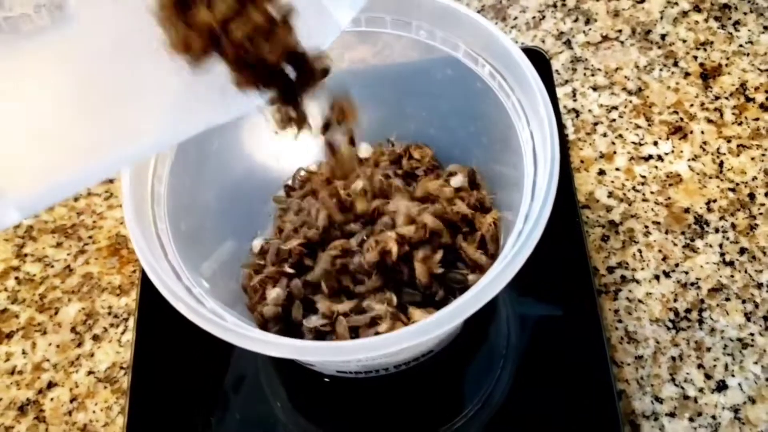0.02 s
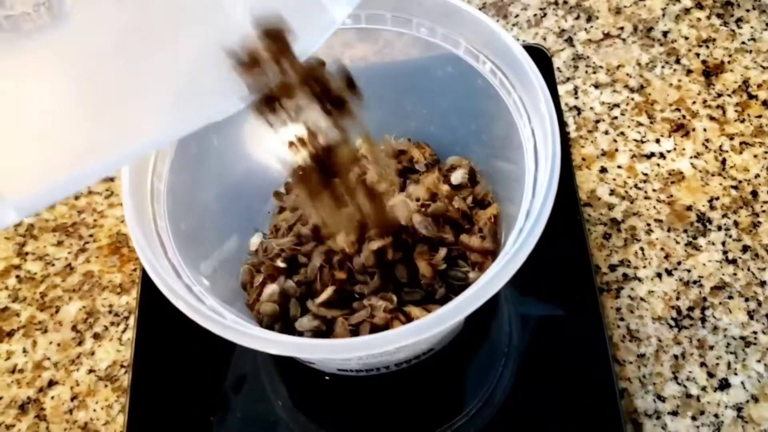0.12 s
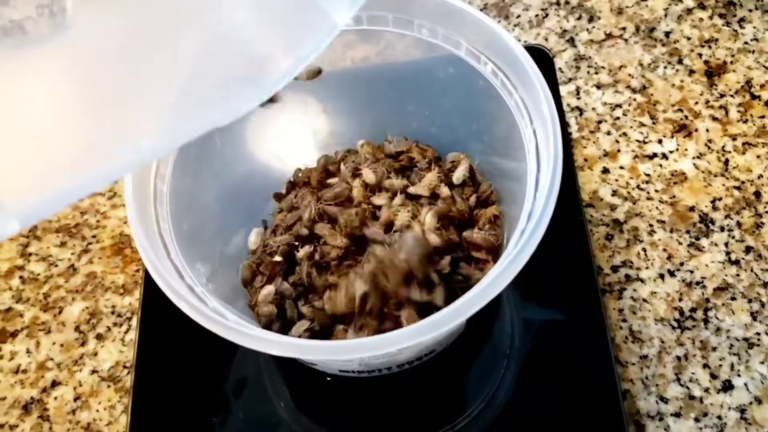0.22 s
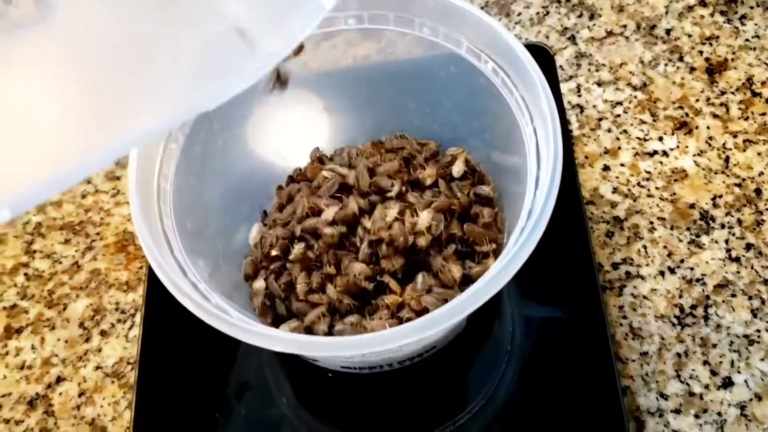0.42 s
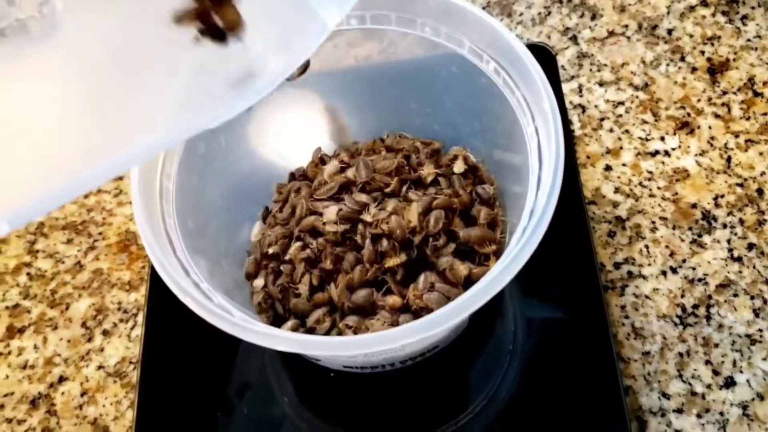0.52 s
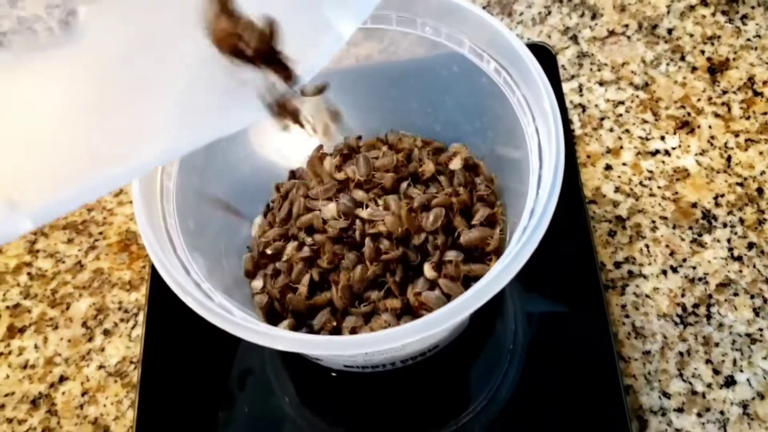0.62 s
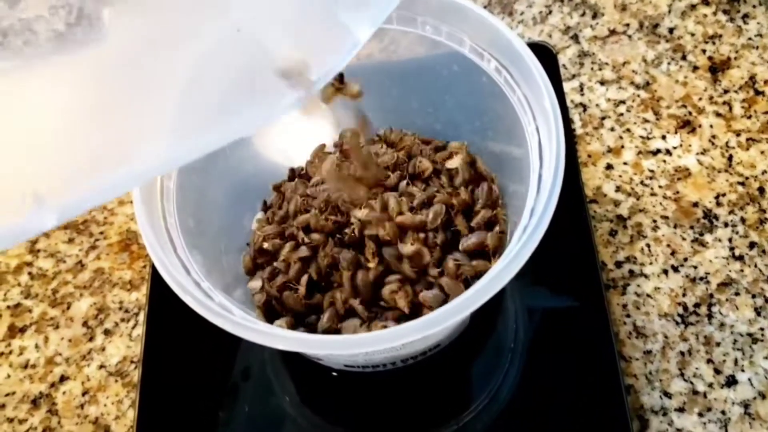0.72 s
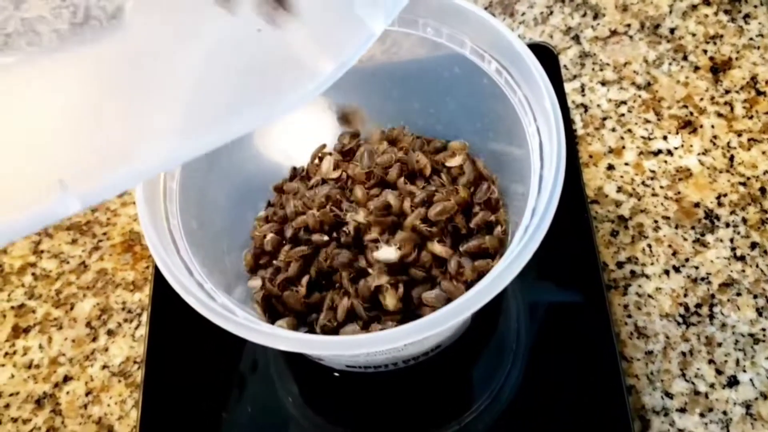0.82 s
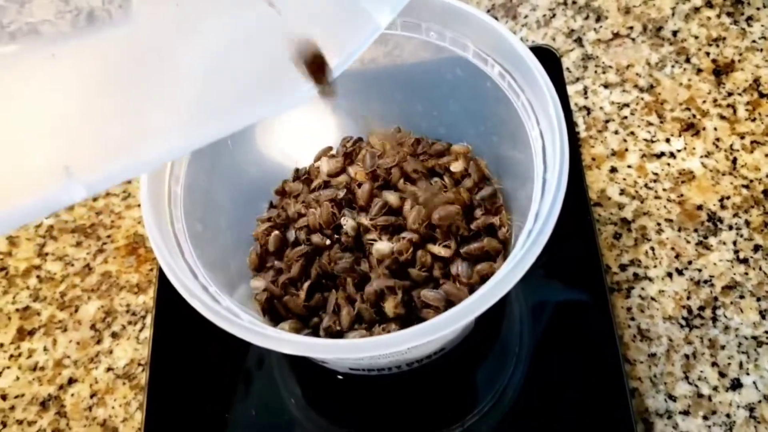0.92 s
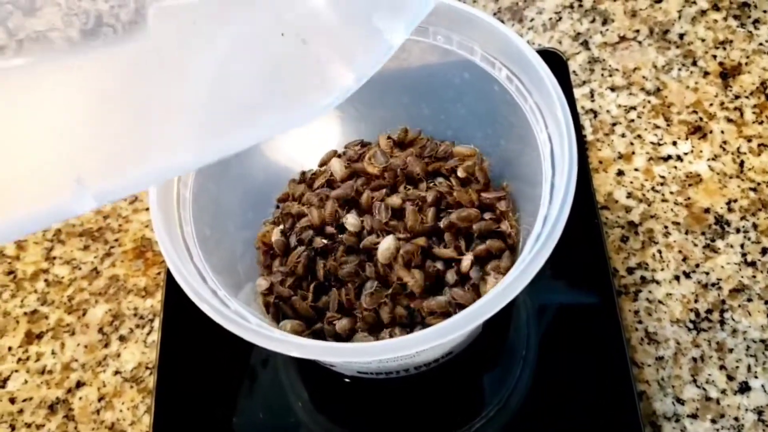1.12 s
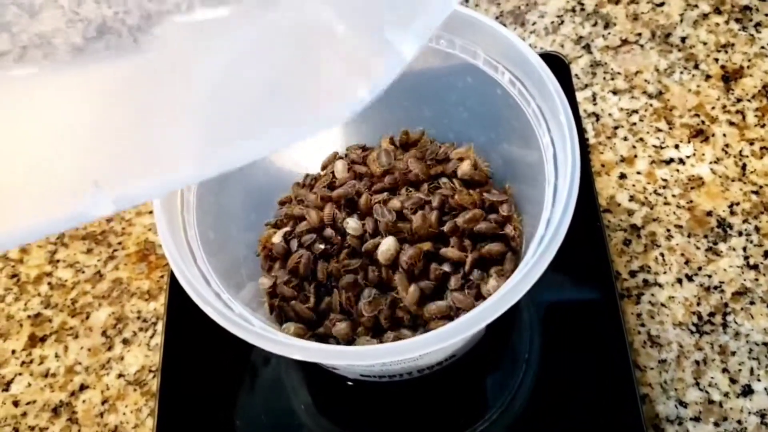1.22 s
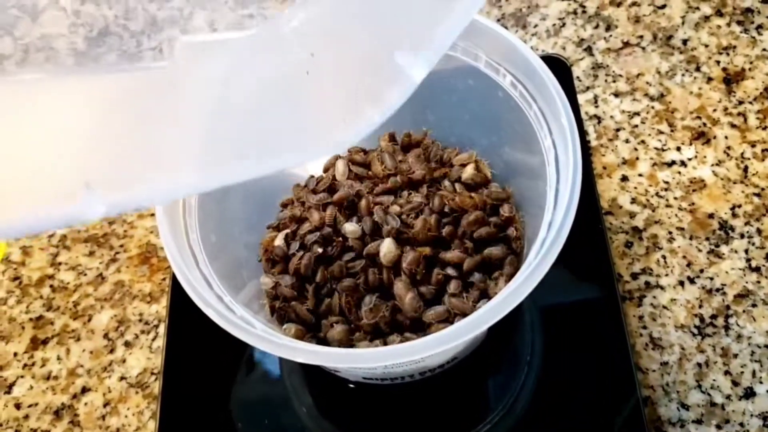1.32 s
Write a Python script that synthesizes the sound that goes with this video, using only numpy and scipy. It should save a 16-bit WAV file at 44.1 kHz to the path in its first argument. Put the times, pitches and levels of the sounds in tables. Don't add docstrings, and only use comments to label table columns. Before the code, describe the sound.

Finger taps on a thin plastic tub, close and dry: insects scrape briefly at the start, a soft touch at 0.15 s, then hollow snapping taps at 0.23, 0.41, 0.53 (hardest), 0.64 and 0.75 s. Grains slide left; small ticks and knocks land in a cup, often right. After 0.85 s, faint scratching, sparse clicks near 1.0-1.36 s, a soft cup flex at 1.2 s, low hum and hiss.

```python
import sys
import numpy as np
from scipy import signal
from scipy.fft import rfft, irfft
from scipy.io import wavfile
from scipy.ndimage import uniform_filter1d

SR = 44100
rng = np.random.default_rng(int(sys.argv[2]) if len(sys.argv) > 2 else 0)


def store_wav(level_fs):
    pcm = np.round(np.clip(np.atleast_2d(level_fs), -1, 1) * 32767)
    wavfile.write(sys.argv[1], SR, pcm.T.astype(np.int16))


def to_linear_factor(level_db):
    exponent = np.asarray(level_db, float) / 20
    return 10 ** exponent


N = 61740


def read(points, x):
    a, b = np.transpose(points)
    return np.interp(x, a, b)


def colour(x, points):
    hz, db = np.transpose(points)
    f = np.fft.rfftfreq(x.shape[-1], 1 / SR)
    gain = to_linear_factor(np.interp(np.log(f + 1), np.log(hz), db)) * np.sqrt(SR / 2)
    return irfft(rfft(x) * gain, x.shape[-1])


def evened(x):
    return x / np.sqrt(np.mean(x ** 2) + 1e-20)


def crackle(per_s, spread_db):
    size = to_linear_factor(spread_db * np.minimum(rng.exponential(1, (2, N)), 3.2))
    size = size * rng.standard_normal((2, N))
    return evened(size * (rng.random((2, N)) < per_s / SR))


def ring(hz, db, t60, lag_s=0):
    t = np.maximum(np.arange(SR // 4) / SR - lag_s, 0)
    return to_linear_factor(db - 60 * t / t60) * np.sin(2 * np.pi * hz * t)


def push(ms):
    u = np.arange(600) / (ms * SR / 1000)
    force = np.exp(-(5.2 * (u - .75)) ** 2 / 2)
    return force / force.sum()


def add(mix, s, sound):
    part = mix[:, round(s * SR):][:, :sound.shape[1]]
    part += sound[:, :part.shape[1]]


def sides(db):
    return to_linear_factor(np.array([[min(db, 0)], [min(-db, 0)]]))


def slides():
    # start t/s, length/s, level/dB
    shakes = [
        (-.03, 0.081, -42.5),
        (0.051, 0.1, -56.5),
        (0.23, 0.028, -46.5),
        (0.247, 0.1, -56.5),
        (0.421, 0.049, -52.5),
        (0.558, 0.04, -47.5),
        (0.649, 0.051, -52),
        (0.744, 0.091, -65.5),
    ]
    # f/Hz, level/dB
    scrape = [(150, -6.5), (500, 0.5), (1000, 0), (2200, -3.5), (3800, -8.5), (7000, -14.5), (8800, -24),
              (15000, -36)]
    bed_db, bed_end_s, right_db = -64, 0.836, -12.5
    t = np.arange(N) / SR
    swell = to_linear_factor(bed_db) * np.clip((bed_end_s - t) / 0.14, 0, 1)
    for s, length, db in shakes:
        swell = swell + to_linear_factor(db) * np.sin(np.pi * np.clip((t - s) / length, 0, 1)) ** 2
    rush = evened(colour(crackle(14000, spread_db=-0.5), scrape))
    return swell * rush * to_linear_factor(np.array([[0], [right_db]]))


def legs():
    # t/s, level/dB
    bustle = [(0, 7), (.1, 7.5), (.22, 8.5), (.35, 5.5), (.5, 6), (.65, 4.5), (.78, 3.5), (.86, 2.5),
              (.93, 1), (.965, 3.5), (1.02, 2), (1.06, 1), (1.13, -1.5), (1.16, 0), (1.4, 1)]
    # f/Hz, level/dB per Hz
    left_tone = [(300, -125), (1000, -118), (1500, -121), (3000, -123), (6000, -127), (7500, -117),
                 (11000, -128), (15500, -142)]
    right_tone = [(600, -118), (1500, -120), (2500, -110), (3400, -113), (5600, -102), (7200, -116),
                  (12500, -110), (15500, -128)]
    left_bustle = 2.23
    db = read(bustle, np.arange(N) / SR)
    left, right = crackle(7400, spread_db=2)
    flicker = 0.45 * evened(uniform_filter1d(rng.standard_normal(N), 250))
    scratch = np.array([colour(left, left_tone), colour(right, right_tone)])
    return scratch * to_linear_factor(db * [[left_bustle], [1]] + flicker)


def hum():
    # f/Hz, level/dB per Hz
    tone = [(40, -125), (80, -112), (140, -99), (260, -101), (400, -106), (600, -108), (1000, -120),
            (2000, -135)]
    # t/s, level/dB
    stir = [(0, 8.5), (.7, 18), (.9, 5), (1.12, -0.5), (1.16, 11), (1.4, 6.5)]
    left_db, same = -5, 0.72
    right, other = rng.standard_normal((2, N))
    left = to_linear_factor(left_db) * (same * right + np.sqrt(1 - same ** 2) * other)
    return colour(np.array([left, right]), tone) * to_linear_factor(read(stir, np.arange(N) / SR))


def appliance():
    # f/Hz, width/Hz, left level/dB, right level/dB
    bands = [(2163, 420, -69.5, -77.5), (904, 290, -85, -82.5)]
    f = np.fft.rfftfreq(N, 1 / SR)
    hiss = rfft(rng.standard_normal((2, N)))
    out = np.zeros((2, N))
    for hz, width, left_db, right_db in bands:
        band = irfft(hiss / (1 + (2 * (f - hz) / width) ** 2), N)
        out += to_linear_factor(np.array([[left_db], [right_db]])) * evened(band)
    waver = 2 * evened(uniform_filter1d(rng.standard_normal(N), 2500))
    return out * to_linear_factor(waver)


def knocks():
    # t/s, level/dB, contact/ms, left minus right/dB
    bodies = [(0.14, -48.5, 1.4, 32), (.008, -52.5, 0.43, 3), (0.195, -54, 1.6, 21),
              (0.2422, -31.5, 0.93, 26), (0.2709, -42, 0.27, -15), (0.3129, -42, 0.23, -30.5),
              (0.3142, -30.5, 0.36, 17), (0.4632, -45.5, 0.35, -7), (0.5309, -38, 0.36, 20),
              (0.5916, -37.5, 0.29, -25), (0.73, -51.5, 0.61, -4), (0.6811, -41.5, 0.22, -3),
              (1.147, -54, 0.36, -11.5), (1.161, -55, 1.9, -19), (1.252, -53, 1.9, -4.5),
              (1.292, -56.5, 4.7, -6)]
    # f/Hz, level/dB, t60/s, first swing out +1 or in -1
    plastic_modes = [(126, -6, .048, 1), (207, -7, .071, 1), (282, 7, .01, -1), (429, -4, .036, -1),
                     (553, -6, .015, 1)]
    lead_s, snap_db = .00025, 3
    out = np.zeros((2, N))
    body = sum(way * ring(hz, db, t60, -lead_s) for hz, db, t60, way in plastic_modes)
    for s, db, ms, pan_db in bodies:
        force = push(ms)
        knock = np.convolve(body, force)
        knock[:len(force)] -= to_linear_factor(snap_db) * force / force.max()
        add(out, s, to_linear_factor(db) * sides(pan_db) * knock)
    return out


def taps():
    # t/s, level/dB, contact/ms, spot 0 near or 1 far, pitch ratio from the grip
    fingers = [
        (0.154, -21.5, 8.7, 0, 0.7),
        (0.2318, -7, 0.6, 0, 1),
        (0.4051, 0, 0.52, 0, 0.99),
        (0.5337, 1.5, .3, 0, 1.01),
        (0.6373, -6, 0.2, 1, 1.003),
        (0.7492, -9.5, 1.24, 1, 1.045),
    ]
    right_dbs = [-1.5, 0, -2.5, 0.5, 1, -0.5]
    # f/Hz, level/dB, t60/s, first swing (+ out, - in
    near_left = [(88, -29, .18, 1), (110, -33, .2, 1), (230, -24, .035, 1), (273, -22.5, .098, 1),
                 (350, -24, .05, 1), (492, -14.5, .032, 1), (813, -17, .008, -1), (1322, -32, .034, 1),
                 (1399, -23, .012, 1), (2158, -36, .015, 1), (4790, -17, .001, 1)]
    near_right = [(87, -43, .2, 1), (106, -40, .175, 1), (182, -33.5, .15, -1), (311, -33.5, .05, 1),
                  (381, -47, .14, -1), (539, -22, .029, -1), (887, -23.5, .014, 1), (1258, -35.5, .014, 1),
                  (2505, -34.5, .016, 1)]
    far_left = [(75.3, -35, 0.23, -0.033), (106.4, -28.5, 0.13, 1), (150, -30, 0.17, -0.78),
                (177.5, -27, 0.094, -0.9), (324, -17.5, 0.032, 0.67), (493.6, -14, 0.027, 0.52),
                (565, -16.5, 0.033, -1.13), (867, -20, 0.012, -1.7), (1491, -13, 0.0028, 0.95),
                (2050, -23.5, 0.012, -0.97), (3020, -25, 0.0099, 0.94), (4770, -17.5, 0.00064, -2.5)]
    far_right = [(73, -32, 0.11, -0.91), (108, -20.5, 0.065, 1), (178.5, -23, 0.14, -0.66),
                 (298, -24.5, 0.084, 0.43), (524, -18, 0.056, -0.85), (640, -13, 0.004, -0.079),
                 (993, -7, 0.035, 0.015), (1280, -31, 0.033, 1)]
    # left level/dB, right level/dB
    dent_db = [
        [13.8, -10],
        [.33, -10],
    ]
    # left/ms, right/ms
    lag_ms = [
        [.52, .47],
        [.8, .83],
    ]
    modes = [(near_left, near_right), (far_left, far_right)]
    rattle_db, rattle_t60 = [-21, -22], .015
    fast_hz = [9000, 1500]
    grip_hz = 400
    right_late = 16
    out, t = np.zeros((2, N)), np.arange(SR // 4) / SR
    for (s, db, ms, spot, grip), right_db in zip(fingers, right_dbs):
        spot = int(spot)
        body = np.zeros((2, SR // 4))
        for side in (0, 1):
            for hz, mode_db, t60, way in modes[spot][side]:
                lag_s = lag_ms[spot][side] / 1000 if hz < fast_hz[spot] else 0
                pitch = hz * grip if hz > grip_hz else hz
                body[side] += way * ring(pitch, mode_db, t60, lag_s)
        body[(0, 1), (0, right_late)] += (2 * spot - 1) * to_linear_factor(np.array(dent_db[spot]))
        rattle = rng.standard_normal((2, SR // 4)) * to_linear_factor(rattle_db[spot] - 60 * t / rattle_t60)
        body += rattle * sides(10.7)
        hit = signal.oaconvolve(body, push(ms)[None], axes=1)
        add(out, s, to_linear_factor(db) * sides(-right_db) * hit)
    return out


def ticks():
    # t/s, peak level/dB, f/Hz, left minus right/dB, t60/s
    shells = [(0.187, -50, 12300, -5, 0.0093), (0.1888, -49.5, 4840, 3, 0.0087),
              (.1905, -48.5, 12150, -14, 0.0076), (0.1914, -43.5, 5900, -6, 0.0098),
              (.2428, -42.5, 2030, 24, 0.017), (0.405, -29, 5300, 18, 0.0037),
              (.573, -37.5, 970, 15, 0.019), (0.2797, -45, 6300, -5, 0.021),
              (0.2947, -48, 5700, -13, 0.0079), (0.3048, -34.5, 4970, -16, 0.0061),
              (0.3068, -46, 2210, 5, 0.0064), (.3048, -45, 12230, -9, 0.0078),
              (0.442, -38.5, 2720, 18, 0.0078), (0.5332, -35.5, 9100, 22, 0.0031),
              (0.673, -52.5, 3320, -17, 0.0054), (0.680, -39.5, 2820, -19, 0.01),
              (0.756, -47, 4600, -23, 0.0074), (0.759, -39.5, 5610, -30, 0.013),
              (0.7613, -51, 12340, -15, 0.0085), (0.7693, -43, 5200, -26, 0.0079),
              (.770, -48, 11500, -19, 0.0072), (0.797, -38, 4760, -40, 0.0064),
              (0.886, -63, 4930, -14, 0.0077), (0.931, -71, 5000, -7, .006),
              (0.9535, -56.5, 6270, -20.5, 0.015), (1.0169, -47.5, 6070, -11, 0.0051),
              (1.02, -54.5, 11660, -12, 0.006), (1.1052, -53, 5600, -13, 0.0094),
              (1.1448, -52, 12300, -13.5, 0.017), (1.147, -52.5, 4300, -14, 0.0062),
              (1.2013, -35, 4230, -37, 0.0041), (1.198, -40, 5300, -21, 0.0056),
              (1.2146, -51, 4970, -16, 0.01), (1.2543, -41.5, 3800, -25, 0.0066),
              (1.2542, -53.5, 2410, -23, 0.022), (1.3608, -52, 5540, -5, 0.0027)]
    # f/Hz, level/dB
    shell_tone = [(2000, 7), (3500, 2.5), (5500, 0), (7200, -6.5), (12500, -2), (15500, -6.5)]
    band_octaves, wide_db, rise_s = .24, -20, .0006
    out, t = np.zeros((2, N)), np.arange(SR // 4) / SR
    f = np.fft.rfftfreq(SR // 4, 1 / SR) + 1
    rise = np.sin(np.pi / 2 * np.minimum(t / rise_s, 1)) ** 2
    for s, db, hz, pan_db, t60 in shells:
        noise = rfft(colour(rng.standard_normal(SR // 4), shell_tone))
        near_pitch = np.exp(-(np.log2(f / hz) / band_octaves) ** 2 / 2)
        crack = evened(irfft(noise * (to_linear_factor(wide_db) + near_pitch), SR // 4))
        crack = crack * to_linear_factor(-60 * t / min(t60, .01))
        tick = ring(hz, 0, t60) + crack * sides(-9.5)
        add(out, s, to_linear_factor(db) * sides(pan_db) * tick * rise)
    return out


def cup_flex():
    start_s, length_s, hz, sag, db = 1.212, .065, 305, .25, -53
    out = np.zeros((2, N))
    u = np.arange(0, length_s, 1 / SR) / length_s
    tone = np.sin(2 * np.pi * np.cumsum(hz * (1 - sag * u ** 3)) / SR)
    add(out, start_s, to_linear_factor(db) * sides(-30.0) * np.sin(np.pi * u) * tone)
    return out


def room(x):
    level_db, t60 = -39, .3
    t = np.arange(SR // 4) / SR
    tail = rng.standard_normal((2, SR // 4)) * to_linear_factor(-60 * t / t60) * (t > .0015)
    return to_linear_factor(level_db) * signal.fftconvolve(x, tail / np.linalg.norm(tail[0]), axes=1)[:, :N]


def scene():
    hits = slides() + knocks() + taps() + ticks() + cup_flex()
    return hits + room(hits) + legs() + hum() + appliance()


def low_pass(x):
    return signal.sosfilt(signal.butter(12, 15730, fs=SR, output="sos"), x)


def record(dry):
    bass_cut = signal.butter(5, 60, "high", fs=SR, output="sos")
    mix = signal.sosfilt(bass_cut, dry)
    return low_pass(mix)


dry = scene()
out = record(dry)
store_wav(out)
```